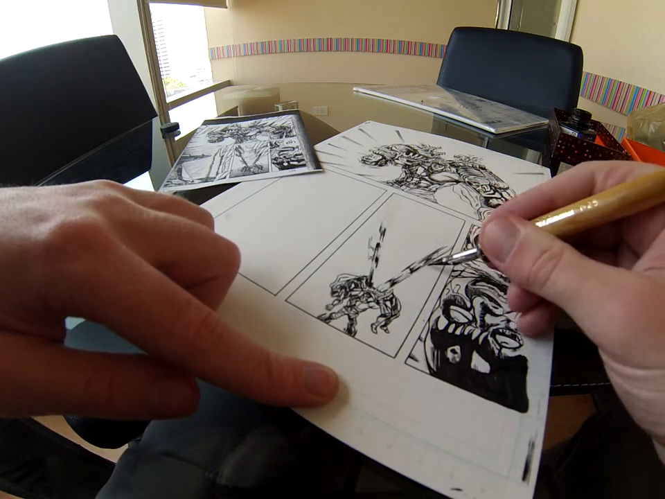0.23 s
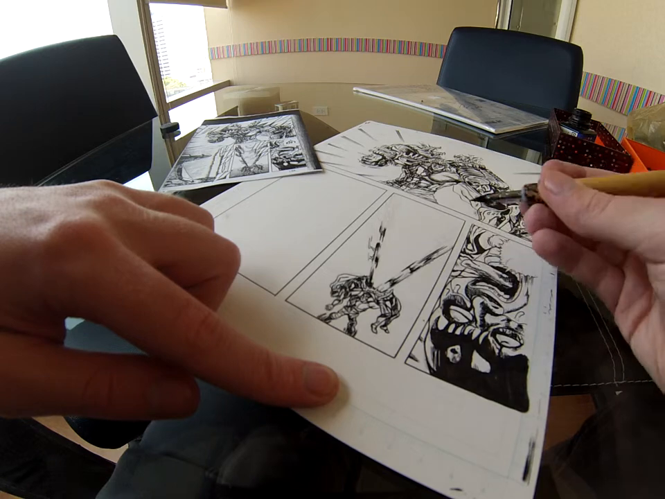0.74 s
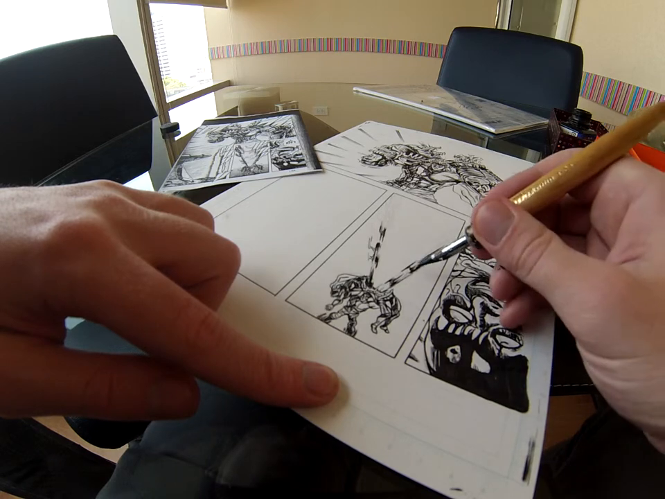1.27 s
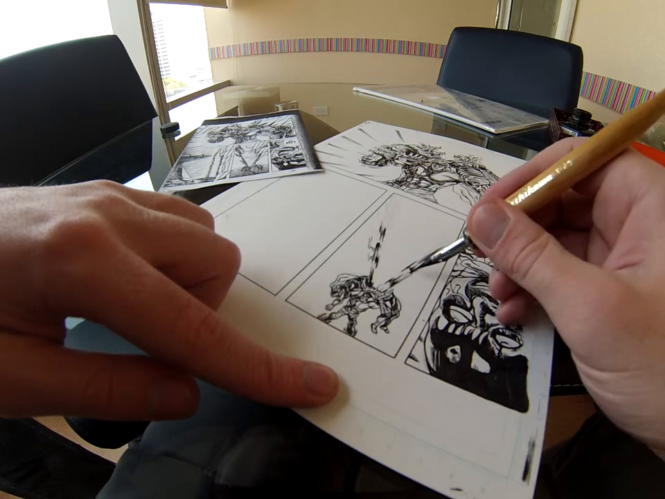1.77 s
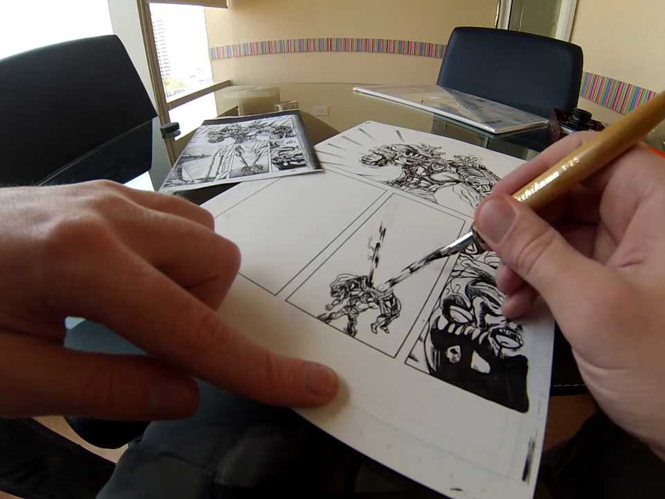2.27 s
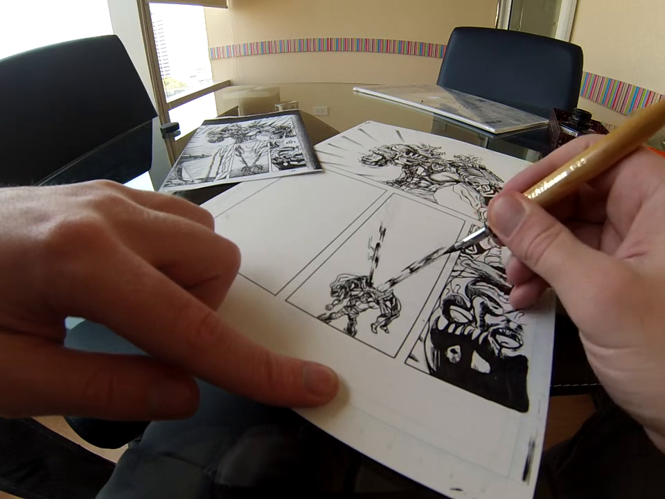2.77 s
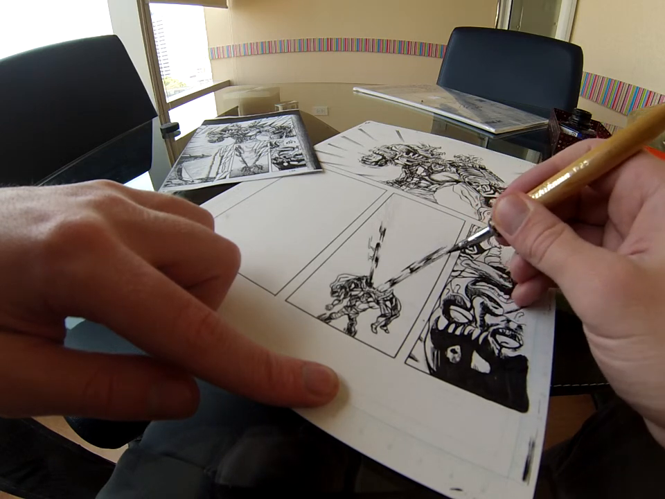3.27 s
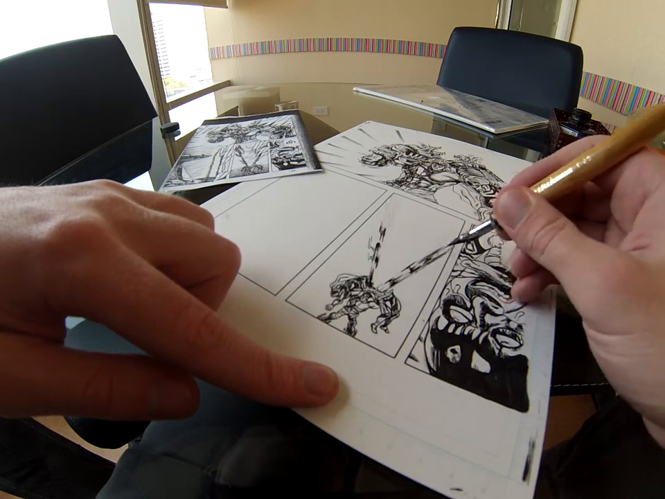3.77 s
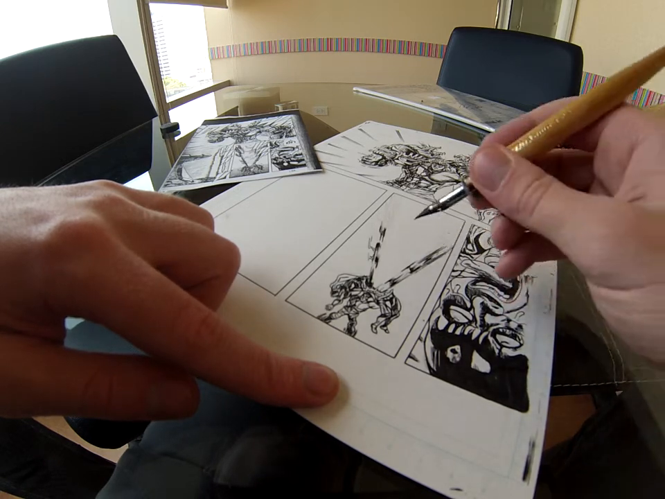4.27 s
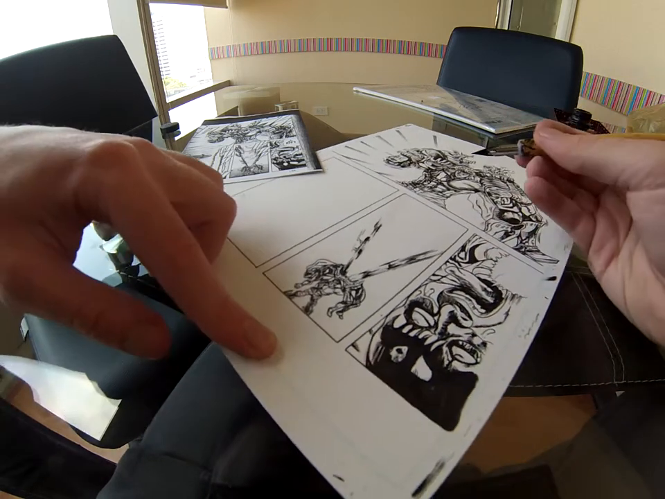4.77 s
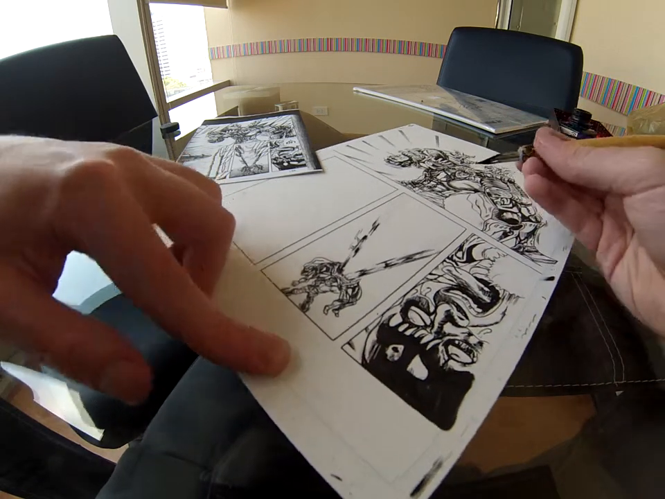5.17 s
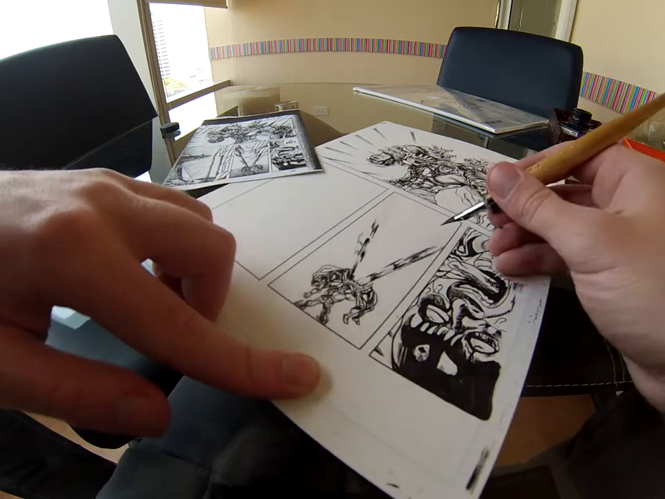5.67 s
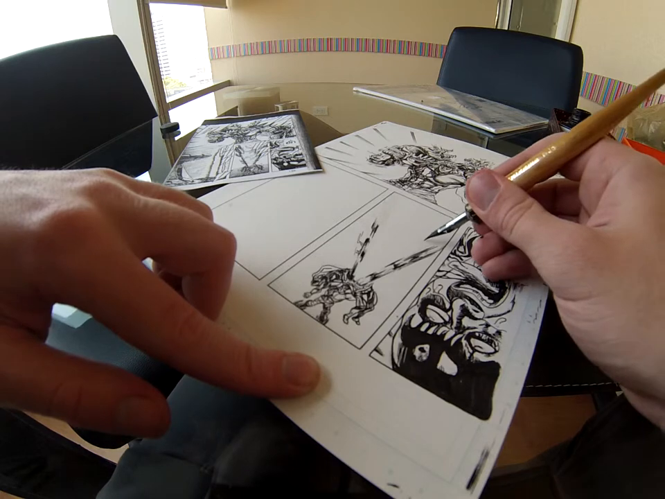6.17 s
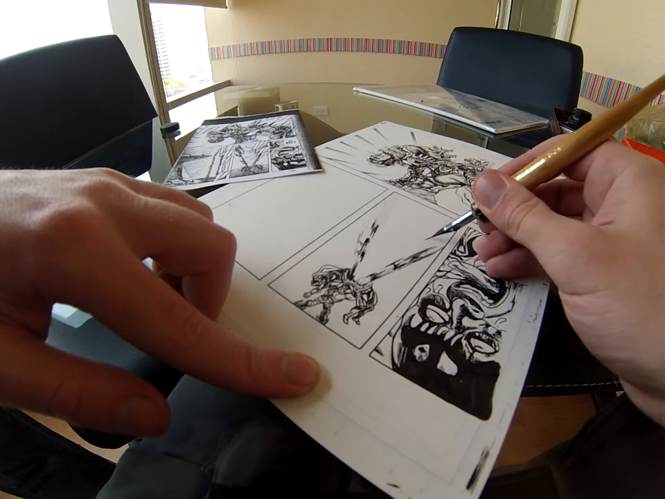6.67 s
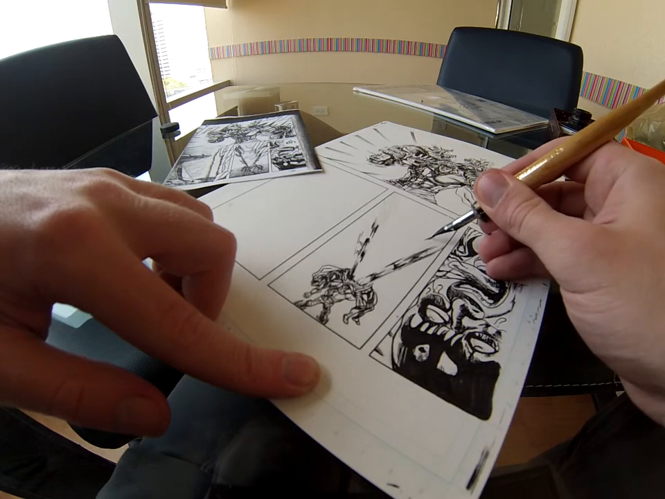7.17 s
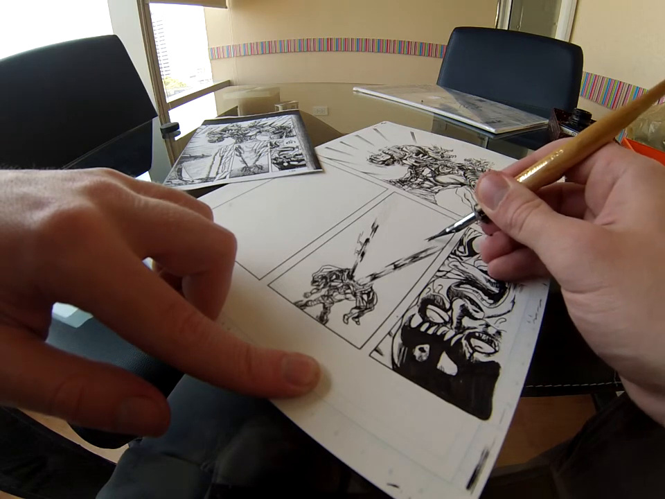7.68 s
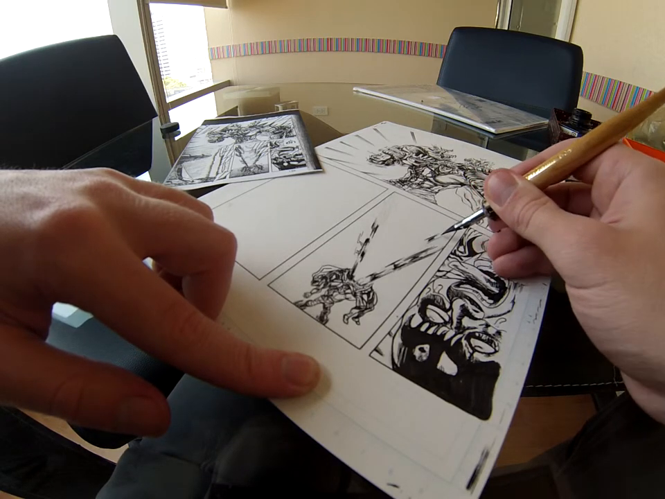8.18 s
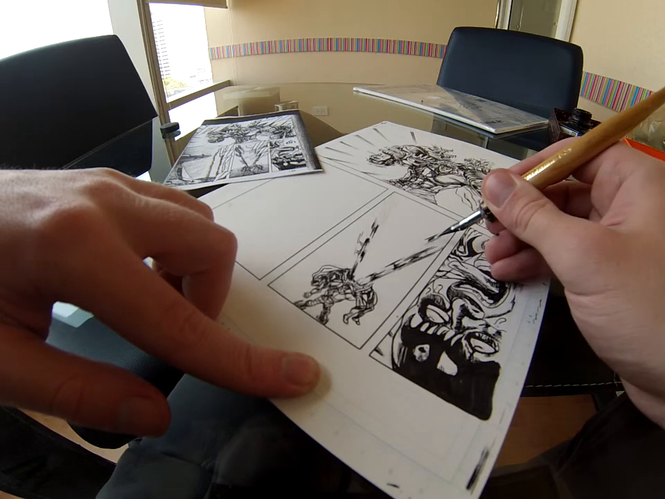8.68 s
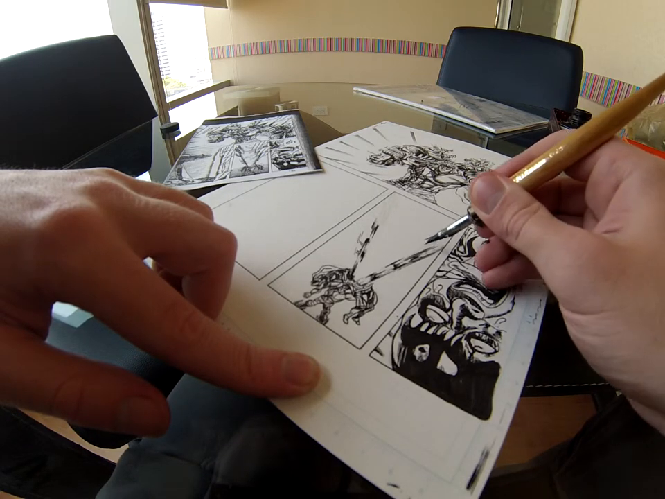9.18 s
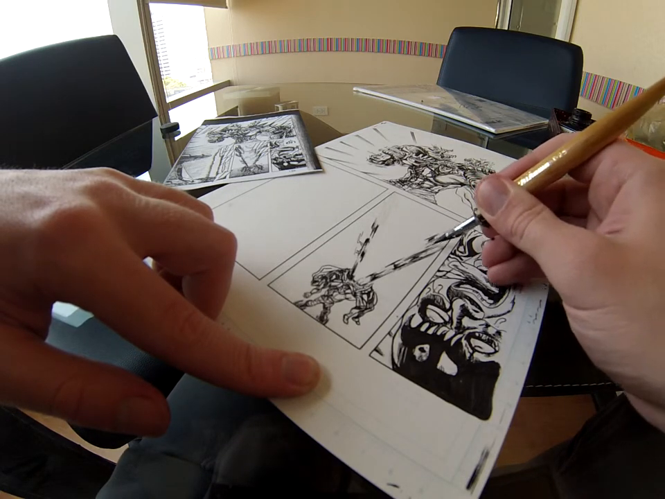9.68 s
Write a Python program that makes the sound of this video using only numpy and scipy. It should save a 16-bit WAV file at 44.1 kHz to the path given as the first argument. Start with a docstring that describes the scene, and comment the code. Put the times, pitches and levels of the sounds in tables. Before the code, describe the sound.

Close, quiet pen nib scratches and tiny ticks on paper, pausing midway, while a small room hums steadily.

```python
"""Dip pen hatching on drawing board

A steel nib hatches short lines, close up, in runs of about four strokes a second. It ticks as it lands,
snaps over the paper fibres and now and then squeaks; the hand glides back between strokes, and in the
pause the sheet is turned. Under it all the small room drones with a steady low hum."""
import sys
import numpy as np
from scipy import signal
from scipy.fft import rfft, irfft
from scipy.io import wavfile

SR = 44100
rng = np.random.default_rng(int(sys.argv[2]) if len(sys.argv) > 2 else 0)


def to_wav(sig):
    """Store sig (one row per channel, or 1-D mono) as 16-bit WAV at the path in sys.argv[1].

    Samples outside -1..1 are clipped; the rate is SR.
    """
    pcm = np.clip(np.atleast_2d(sig), -1, 1) * 32767
    pcm = np.round(pcm).astype(np.int16)
    wavfile.write(sys.argv[1], SR, pcm.T)  # frames by channels


N = 437472

# The tone of the room's air. Each row: frequency in Hz, relative gain in dB.
AIR_CURVE = [(8, 7.5), (22, 3), (36, -3), (100, -2), (290, -2), (400, -8), (485, -12.5), (515, -17),
             (650, -22), (1000, -27), (1300, -31), (2300, -33.5), (4000, -39.5), (9000, -45.5),
             (15500, -49)]
# The room modes that drone. Each row: frequency in Hz, nominal width in Hz, rms level in dB.
ROOM_MODES = [(21.94, 4, -45), (50.87, 3.05, -46.5), (57.17, 5.7, -45), (79, 5.1, -54), (144.9, 8.5, -51.5),
              (218.7, 11, -54.5), (253.7, 7, -52.5), (276.5, 6, -52.5), (320.8, 3.54, -56),
              (394.4, 18, -57.5), (434.1, 5.3, -59.5), (485, 10.1, -62.5), (680.3, 8.7, -71.5),
              (708, 2.1, -74), (935, 38, -75)]
# The hiss of skin on paper. Each row: frequency in Hz, relative gain in dB.
SKIN_CURVE = [(500, -25), (2000, -6), (5000, -2.5), (7000, -1), (8800, -2), (11000, -1.5), (15000, -11)]
# Quick brushes on the paper. Each row: peak in seconds, fall in seconds, level in dB, tilt in dB/octave.
BRUSHES = [(.484, .024, -65, 2), (3.846, .017, -57, 1), (4.989, .004, -56, -5), (5.134, .008, -57.5, 5)]
# The whistling band of gliding skin. Each row: frequency in Hz, nominal width in Hz, relative gain in dB.
SHEEN_BAND = [(9000, 1900, -2)]
# The sheet is pushed round. Each row: fastest moment in seconds, level in dB.
SHEET_PUSHES = [(4.29, -67), (4.97, -65.5)]
# Soft bumps of hand and holder. Each row: start in seconds, pitch in Hz, level in dB.
SOFT_BUMPS = [(.782, 900, -58), (4.015, 750, -58), (9.19, 760, -57)]
# Landings hard enough to tick. Each row: start in seconds, level in dB taken over one millisecond.
LANDINGS = [(1.266, -58), (1.529, -55), (2.647, -57), (2.910, -59), (3.145, -57), (3.372, -59),
            (7.325, -61), (8.038, -54), (8.288, -48.5), (8.710, -55), (8.9408, -52), (9.169, -53),
            (9.366, -60)]
# The hatched lines. Each row: middle in seconds, half length in seconds, base level in dB.
PEN_STROKES = [ (1.337, 0.036, -58.5), (1.613, 0.037, -51.5), (1.907, 0.037, -52), (2.152, 0.035, -47.5),
               (2.426, 0.041, -48.5), (2.704, 0.048, -50), (2.963, 0.036, -50.5), (3.201, 0.039, -50.5),
               (3.422, .02, -52.5), (5.968, 0.038, -56.5), (6.203, .026, -58), (6.419, .032, -63),
               (6.621, 0.014, -62.5), (7.402, .022, -64.5), (7.607, .028, -64), (7.833, .028, -54),
               (8.079, 0.027, -55.5), (8.312, 0.023, -61), (8.527, 0.027, -55), (8.753, 0.033, -55.5),
               (8.991, 0.033, -52), (9.224, 0.036, -53.5), (9.419, 0.03, -58.5), (9.611, 0.026, -61.5),
               (9.808, 0.036, -63)]
# How the sheet radiates the scratching. Each row: frequency in Hz, relative gain in dB.
SHEET_CURVE = [(300, -29), (900, -3.5), (1700, -4), (2700, 2), (3300, -4.5), (4300, -7), (5100, 2.5),
               (5650, -0.5), (5950, -18), (6450, -1), (7700, -10), (10500, -8), (11800, -14.5),
               (17000, -27)]
TURNED_SHEET_CURVE = [(300, -30), (900, 2), (1500, 1), (2000, -1), (2700, 4), (3400, -3), (4300, -3),
                      (5300, 2), (5950, -11.5), (6600, -2.5), (7700, -7), (9500, -10.5), (12000, -14),
                      (17000, -20)]  # the nib works at a new angle
# The pen's resonances. Each row: frequency in Hz, nominal width in Hz, relative gain in dB.
TIP_MODES = [(2400, 500, -2), (4700, 1300, -3), (7550, 740, 4.5), (9200, 790, -1), (11500, 2000, -4),
             (14800, 1200, -10)]  # the bare steel tip when struck
NIB_MODES = [(2470, 380, 2), (5610, 180, -1.5), (6400, 220, -4), (6600, 240, -4), (8550, 300, -13),
             (12700, 470, -14)]  # nib and holder
BITE_MODES = [(2850, 440, -1.5), (3730, 360, -3.5), (4090, 320, -1), (4520, 430, -5.5)]  # brought out by hard pressure
SIZZLE_MODES = [(14450, 1300, 0)]  # the very top of the tines
# The lightly loaded nib sings out. Each row: middle in seconds, level in dB.
NIB_SQUEAKS = [(3.419, -59), (7.63, -65), (8.102, -61), (8.314, -63.5)]
# A faint whine. Each row: middle in seconds, half length in seconds, level of the fundamental in dB.
WHINE_SWELLS = [(7.6, .3, -73), (9.554, 0.0054, -61)]


def undb(db):
    """Decibels to gain."""
    return 10 ** (np.asarray(db) / 20)


def unit(x):
    """Scale to an rms of 1."""
    return x / np.sqrt(np.mean(x ** 2))


def bins(size):
    """Frequencies of a spectrum, kept above zero."""
    return np.maximum(np.arange(size // 2 + 1) * SR / size, 1)


def colour(curve, hz):
    """Gain along an EQ curve of (Hz, dB) points."""
    f, db = np.transpose(curve)
    return undb(np.interp(np.log(hz), np.log(f), db))


def resonance(hz, centre, width):
    """Complex response of one damped mode, gain 1 at its centre."""
    return 1 / (1 + 1j * (hz ** 2 - centre ** 2) / (hz * width))


def peaks(modes, hz):
    """Gain of a set of resonances with steep skirts."""
    return sum(undb(db) * np.abs(resonance(hz, f, 0.98 * width)) ** 2 for f, width, db in modes)


def causal(gain):
    """The response with this gain that starts at once and then rings out."""
    cepstrum = irfft(np.log(gain + 1e-9))
    cepstrum[1:] *= 2
    cepstrum[len(cepstrum) // 2:] = 0
    return np.exp(rfft(cepstrum))


def add(out, start, sound):
    """Mix a sound in from a start time in seconds."""
    i = int(start * SR)
    part = sound[max(-i, 0):len(out) - i]
    out[max(i, 0):max(i, 0) + len(part)] += part


def wander(size, rate):
    """Random levels, `rate` a second, joined by straight lines; spread near 1."""
    at = np.arange(size) * rate / SR
    return np.interp(at, np.arange(size // 8), rng.standard_normal(size // 8))


def room_hum(air_db=-42):
    """The bed: broad air noise and low room modes kept ringing by noise."""
    hz = bins(N)
    air = unit(irfft(rfft(rng.standard_normal(N)) * colour(AIR_CURVE, hz), N))
    drive = rfft(rng.standard_normal(N))
    # each peak is a close pair of modes, so its skirts fall steeply
    drone = sum(undb(db) * unit(irfft(drive * resonance(hz, f, 2 * width) ** 2, N))
                for f, width, db in ROOM_MODES)
    return undb(air_db) * air + drone


def hiss(centre_hz, width_hz, db):
    """Faint microphone self-noise, unrelated left and right."""
    noise = rfft(rng.standard_normal((2, N)))
    return undb(db) * unit(irfft(noise * resonance(bins(N), centre_hz, width_hz), N))


def gesture(t, rise, fall, edge):
    """Speed of a hand movement, 1 at its fastest."""
    return np.exp(-np.abs(t / np.where(t < 0, rise, fall)) ** edge)


def friction(speed, snaps_per_s, scatter_db, smooth, grip_db, grip_rate):
    """Paper fibres snap free over a smooth hiss, more often the faster the slide."""
    size = len(speed)
    chance = np.clip(snaps_per_s / SR * np.sqrt(speed), 1e-3, 1)
    snaps = (rng.random(size) < chance) * rng.choice([-1, 1], size) / np.sqrt(chance)
    snaps *= unit(undb(scatter_db * np.clip(rng.standard_normal(size), -2, 2)))
    force = snaps + smooth * rng.standard_normal(size)
    return force * undb(grip_db * wander(size, grip_rate))  # the paper's tooth makes the grip uneven


def rub(force, swell, gain):
    """A swelling force rings a body; rms about 1 at the height of the swell."""
    sound = irfft(rfft(force * swell) * causal(gain))
    return sound * np.sqrt(np.sum(swell ** 2) / np.sum(sound ** 2))


def slide(at, rise, fall, db, tilt_db, sheen=(), size=32768):
    """Skin or sheet slides once: a soft, fine hiss, tilted by `tilt_db` an octave above 1 kHz."""
    out, hz = np.zeros(N), bins(size)
    t = (np.arange(size) - size // 2) / SR
    octaves = np.log2(np.maximum(hz, 1000) / 4000)
    speed = gesture(t, rise, fall, edge=1.3)
    force = friction(speed, snaps_per_s=6000, scatter_db=5.5, smooth=.9, grip_db=2.0, grip_rate=120)
    gain = colour(SKIN_CURVE, hz) * undb(tilt_db * octaves) * (1 + peaks(sheen, hz))
    add(out, at + t[0], undb(db) * rub(force, speed, gain))
    return out


def hand_slides(run_gap_s=.33):
    """The hand glides back midway between the strokes of a run; in pauses it brushes and turns the sheet."""
    glides = sum(slide((at + then) / 2, rise=.067, fall=.067, db=db - 19, tilt_db=-3, sheen=SHEEN_BAND)
                 for (at, _, db), (then, _, _) in zip(PEN_STROKES, PEN_STROKES[1:])
                 if then - at < run_gap_s)
    pushes = sum(slide(at, rise=.14, fall=.14, db=db, tilt_db=-4) for at, db in SHEET_PUSHES)
    brushes = sum(slide(at, rise=.004, fall=fall, db=db, tilt_db=tilt) for at, fall, db, tilt in BRUSHES)
    return glides + pushes + brushes


def bumps(width_hz=89, t60_s=0.25, size=8192):
    """Hand and holder make dull, padded contacts that die away quickly."""
    out, t = np.zeros(N), np.arange(size) / SR
    fade = undb(-60 * t / t60_s)
    for at, hz, db in SOFT_BUMPS:
        body = peaks([(hz, width_hz, 0)], bins(size))
        add(out, at, undb(db) * rub(rng.standard_normal(size), fade, body))
    return out


def snags(per_stroke=1.2, relative_db=-7.5, scatter_db=4, tries=4):
    """The nib catches on a fibre now and then, harder in a firm stroke; gives (seconds, dB) hits."""
    dice = rng.random((len(PEN_STROKES), tries, 2))
    strengths = rng.standard_normal((len(PEN_STROKES), tries))
    hits = []
    for i, (at, half, db) in enumerate(PEN_STROKES):
        for (luck, place), strength in zip(dice[i], strengths[i]):
            if luck < per_stroke / tries:
                hits.append((at + half * (2 * place - 1), db + relative_db + scatter_db * strength))
    return hits


def ticks(scatter_db=1.6, size=1024):
    """Landings and snags ring the steel tip for about a millisecond, each a little differently."""
    out, hz = np.zeros(N), bins(size)
    for at, db in LANDINGS + snags():
        modes = [(f, width, gain + scatter_db * rng.standard_normal()) for f, width, gain in TIP_MODES]
        ring = irfft(causal(peaks(modes, hz)))
        ring *= np.sqrt(SR / 1000 / np.sum(ring ** 2))  # the energy of one millisecond at rms 1
        add(out, at, undb(db) * ring)
    return out


def stroke_speed(t, half, ramp_s=.032):
    """The pen speeds up, holds its speed if the line is long, and stops."""
    ramp = min(half, ramp_s)
    outside_hold = np.maximum(np.abs(t) - (half - ramp), 0)
    return gesture(outside_hold, ramp, ramp, edge=2.14)


def scratches(turn_s=5, firm_db=-50, firm_half_s=0.04, size=16384):
    """The nib drags over the fibres and rings with the sheet; the colour shifts once the sheet is turned."""
    out, hz = np.zeros(N), bins(size)
    t = (np.arange(size) - size // 2) / SR
    for at, half, db in PEN_STROKES:
        if at < turn_s:
            curve, sheet_db, nib_db, sizzle_db = SHEET_CURVE, -2.5, -5, -22
        else:
            curve, sheet_db, nib_db, sizzle_db = TURNED_SHEET_CURVE, -1, -10, -15
        length_doublings = np.log2(half / firm_half_s)
        nib_db -= 2 * length_doublings  # short dabs let the nib ring more
        bite_db = -3 + 0.7 * (db - firm_db) + 4.5 * length_doublings  # harder, longer strokes bite more
        speed = stroke_speed(t, half)
        drag = friction(speed, snaps_per_s=5000, scatter_db=5.5, smooth=.64, grip_db=2.5, grip_rate=290)
        tines = friction(speed, snaps_per_s=4000, scatter_db=4.5, smooth=.47, grip_db=2, grip_rate=350)
        sheet = undb(sheet_db) * rub(drag, speed, colour(curve, hz))
        # the nib rings even under a light touch; the bite needs the full pressure of mid-stroke
        nib = undb(nib_db) * rub(tines, speed ** 0.84, peaks(NIB_MODES, hz))
        bite = undb(bite_db) * rub(tines, speed ** 2.04, peaks(BITE_MODES, hz))
        sizzle = undb(sizzle_db) * rub(tines, speed, peaks(SIZZLE_MODES, hz))
        add(out, at + t[0], undb(db) * (sheet + nib + bite + sizzle))
    return out


def tone(at, half, hz, db, octaves_per_s, waver, waver_rate):
    """A sine swells and fades around `at`, its pitch unsteady and free to glide."""
    out, t = np.zeros(N), np.arange(-3 * half, 3 * half, 1 / SR)
    pitch = hz * 2 ** (octaves_per_s * t) * (1 + waver * wander(len(t), waver_rate))
    wave = unit(np.sin(2 * np.pi * np.cumsum(pitch) / SR))
    swell = np.exp(-(t / half) ** 2)
    add(out, at + t[0], undb(db) * swell * wave)
    return out


def squeaks(squeak_hz=2340, lift_hz=2274, half_s=.012):
    """Rough stick-slip of the tines, sagging in pitch as the pressure comes off."""
    accents = [(at, squeak_hz, db) for at, db in NIB_SQUEAKS]
    # the nib also sings faintly as it lifts, late in every stroke
    lifts = [(at + .8 * half, lift_hz, db - 12) for at, half, db in PEN_STROKES]
    return sum(tone(at, half_s, hz, db, octaves_per_s=-3.5, waver=0.078, waver_rate=1100)
               for at, hz, db in accents + lifts)


def whine(pitch_hz=1510, octave_db=-6):
    """A faint, wavering tone and its octave come and go."""
    return sum(tone(at, half, hz, db + partial_db, octaves_per_s=0, waver=0.0116, waver_rate=100)
               for at, half, db in WHINE_SWELLS
               for hz, partial_db in [(pitch_hz, 0), (2 * pitch_hz, octave_db)])


def reflections(x, t60_s, wet_db):
    """Add a trace of reverb from table and walls, different at each side."""
    t = np.arange(SR // 2) / SR
    tails = rng.standard_normal((2, len(t))) * undb(-60 * t / t60_s) * (t > .003)  # 3 ms pre-delay
    tails /= np.sqrt(np.sum(tails ** 2, axis=1, keepdims=True))
    return x + undb(wet_db) * signal.fftconvolve(x[None], tails, axes=1)[:, :N]


def scene():
    """Pen and hand, nearly dry, over the bed of the humming room."""
    bed = room_hum() + whine() + hiss(centre_hz=5960, width_hz=5900, db=-74.5)
    foley = scratches() + squeaks() + hand_slides() + bumps() + ticks()
    return reflections(foley, t60_s=0.94, wet_db=-54) + bed


def record(dry, top_hz=15250):
    """A steep low-pass shaves off the highest treble."""
    return signal.sosfilt(signal.ellip(12, .2, 70, top_hz, fs=SR, output="sos"), dry)


dry = scene()
out = record(dry)
to_wav(out)
```